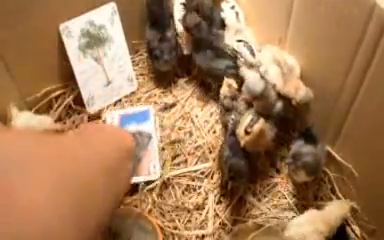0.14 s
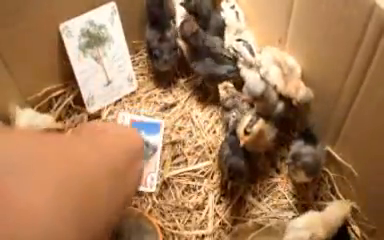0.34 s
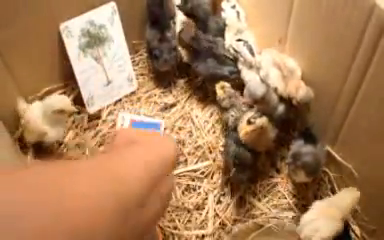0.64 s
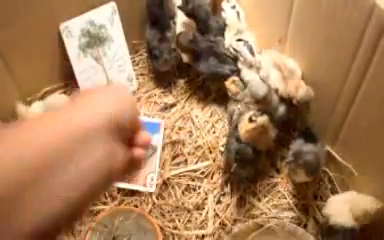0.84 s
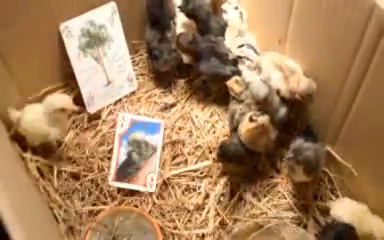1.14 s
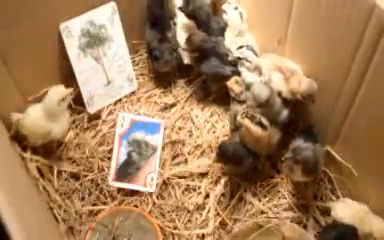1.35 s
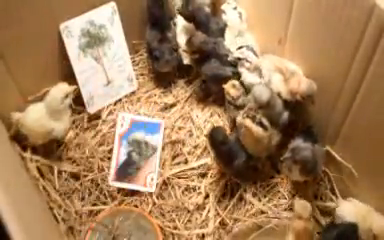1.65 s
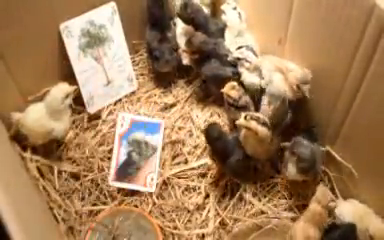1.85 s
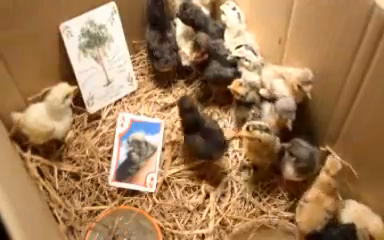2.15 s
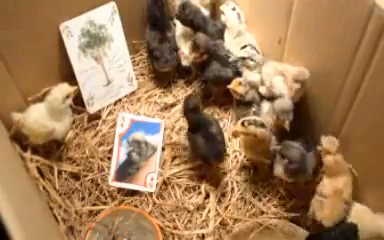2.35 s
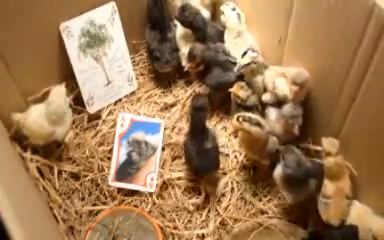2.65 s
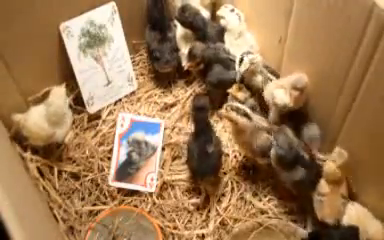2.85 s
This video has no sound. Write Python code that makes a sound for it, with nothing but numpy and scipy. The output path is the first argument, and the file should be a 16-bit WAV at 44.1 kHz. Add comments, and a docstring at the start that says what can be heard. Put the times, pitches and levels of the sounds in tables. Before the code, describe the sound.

Young chicks peep shrilly and repeatedly in a straw-lined cardboard box, with a soft knock

```python
"""Chicks peeping in a straw-lined box

Young chicks peep indoors in a cardboard box, close to the microphone, over room air, a low hum and a thin hiss.
Each loud peep is a gliding whistle: it starts near 5 kHz, breaks downward and slides away as its octave
takes over. Shorter glides make the soft cheeps and chirps of other chicks. Bursts of noise knock on the box,
which rings, and snap in the straw. Echoes from the box and the room are decaying noise."""
import sys
import numpy as np
from scipy import signal
from scipy.fft import rfft, irfft
from scipy.io import wavfile
from scipy.ndimage import uniform_filter1d, minimum_filter1d

SR = 44100
rng = np.random.default_rng(int(sys.argv[2]) if len(sys.argv) > 2 else 0)


def transcribe(u):
    """Save the signal u as a 16-bit wav file named by the first command-line argument.

    u: samples, shape (n,) or (channels, n), limited to [-1, 1]; the rate is SR.
    q: integer samples, one column per channel.
    """
    v = np.clip(np.atleast_2d(u).T, -1, 1)
    q = np.round(v * 32767).astype(np.int16)
    wavfile.write(sys.argv[1], SR, q)


N = 132300  # samples: 3 s


def amp(db):
    """Turns decibels into a gain."""
    return 10 ** (np.asarray(db) / 20)


def unit(x):
    """Scales a sound to an rms (average strength) of 1."""
    return x / np.sqrt(np.mean(x ** 2) + 1e-20)


def read(points, hz):
    """Reads a table between its points, on a logarithmic frequency axis."""
    f, value = np.transpose(points)
    return np.interp(np.log(hz + 1), np.log(f + 1), value)


def add(mix, start_s, sound):
    """Mixes a sound in, starting at a given time."""
    start = max(round(start_s * SR), 0)
    part = mix[start:][:len(sound)]
    part += sound[:len(part)]


def colour(x, points):
    """Filters a sound by a table of frequency and level, then scales it to rms 1."""
    gain = amp(read(points, np.fft.rfftfreq(len(x), 1 / SR)))
    return unit(irfft(rfft(x) * gain, len(x)))


def band(size, hz, octaves):
    """Makes noise of rms 1 in a bell-shaped band around one frequency."""
    f = np.fft.rfftfreq(size, 1 / SR) + 1
    bell = np.exp(-.5 * (np.log2(f / hz) / octaves) ** 2)
    return unit(irfft(rfft(rng.standard_normal(size)) * bell, size))


def wander(rate_hz):
    """Makes smooth random motion of rms 1 by fading out noise above about rate_hz."""
    f = np.fft.rfftfreq(N, 1 / SR)
    smoothing = np.exp(-.5 * (f / rate_hz) ** 2)
    return unit(irfft(rfft(rng.standard_normal(N)) * smoothing, N))


def tone(hz):
    """Makes a sine of rms 1 that follows a pitch curve."""
    return np.sqrt(2) * np.sin(2 * np.pi * np.cumsum(hz) / SR)


def background():
    """Room air as coloured noise, a hum of tones wavering in pitch, and a thin hiss that flickers in level."""
    # colour of the air: [f/Hz, relative level/dB]
    air_colour = [(15, -40), (25, -7.5), (91, 3), (173, -2.5), (246, -1), (433, -6.5), (567, -7), (848, -5),
                  (970, -7), (1380, -6.5), (2630, -8), (3260, -7), (4870, -3.5), (7500, -8), (8810, -6),
                  (11200, -13.5), (15500, -23)]
    # tones of the hum: [f/Hz, level/dB]
    hum_tones = [(194, -63), (243, -57.5), (582, -64), (873, -62.5)]
    air_db, air_waver_db, air_waver_hz = -41.5, 0.26, 15
    hum_waver_hz, hum_waver_rate_hz = 2.74, 5.24
    hiss_hz, hiss_octaves, hiss_db = 7363, .028, -49.5
    hiss_flutter_db, hiss_flutter_hz = 4.5, 16

    hum = sum(amp(db) * tone(hz + hum_waver_hz * wander(hum_waver_rate_hz)) for hz, db in hum_tones)
    air_level = amp(air_db + air_waver_db * wander(air_waver_hz))
    air = air_level * colour(rng.standard_normal(N), air_colour)
    hiss_level = amp(hiss_db + hiss_flutter_db * wander(hiss_flutter_hz))
    hiss = hiss_level * band(N, hiss_hz, hiss_octaves)
    return air + hum + hiss


def knocks():
    """Dull contacts: a fading burst of noise plus the ringing tones of the cardboard."""
    # knocks on the box: [t/s, contact level/dB, contact f/Hz, contact width/octaves, ring level/dB]
    hits = [(0.846, -23.5, 1020, 0.77, -33.5), (.882, -28, 1650, .4, -49), (2.964, -34.5, 1620, 0.6, -43),
            (2.99, -35.5, 1400, 1.2, -51)]
    # ringing tones of the box: [f/Hz, relative level/dB, time to fall 60 dB/s]
    box_tones = [(96, 1, 0.061), (141, -2, 0.071), (216, 1, 0.029), (256, -1, 0.08), (511, 2.5, 0.034),
                 (1248, 9.5, 0.026)]
    contact_t60_s, ring_rise_s = 0.028, 0.0019

    out = np.zeros(N)
    t = np.arange(SR // 2) / SR
    ring = np.zeros(len(t))
    for hz, db, t60_s in box_tones:
        ring += amp(db - 60 * t / t60_s) * np.sin(2 * np.pi * (hz * t + rng.random()))
    ring *= np.minimum(t / ring_rise_s, 1)
    for start_s, db, hz, octaves, ring_db in hits:
        contact = amp(db - 60 * t / contact_t60_s) * band(len(t), hz, octaves)
        add(out, start_s, contact + amp(ring_db) * ring)
    return out


def straw():
    """Stalks shift and snap: each rustle is many tiny fading bursts of noise at random times and levels."""
    # rustles: [start t/s, length/s, middle level of the snaps/dB]
    rustles = [(0.851, 0.045, -34), (0.934, 0.08, -35)]
    snap_hz, snap_octaves, snap_t60_s = 1570, 1.6, 0.0063
    snaps_per_s, spread_db = 350, 5  # levels lie up to spread_db above or below the middle

    out = np.zeros(N)
    t = np.arange(SR // 50) / SR
    for start_s, length_s, db in rustles:
        for when, size in rng.random((int(length_s * snaps_per_s), 2)):
            snap = band(len(t), snap_hz, snap_octaves) * amp(-60 * t / snap_t60_s)
            snap_db = db + spread_db * (2 * size - 1)
            add(out, start_s + when * length_s, amp(snap_db) * snap)
    return out


def beak(hz):
    """The throat and beak weaken a tone more and more the higher it lies above their limit."""
    limit_hz, db_per_octave = 8140, -53
    return amp(db_per_octave * np.log2(np.maximum(hz / limit_hz, 1)))


def glide(length_s, from_hz, to_hz, db, bend=1):
    """A short whistle swells and fades as it slides; bend above 1 makes the slide steepen toward the end."""
    u = np.arange(0, length_s, 1 / SR) / length_s
    hz = from_hz + (to_hz - from_hz) * u ** bend
    return amp(db) * np.sqrt(np.sin(np.pi * u)) * beak(hz) * tone(hz)


def second_voices():
    """A second voice of the syrinx, the bird's voice organ, beats against the start of some peeps."""
    # second voices: [start t/s, length/s, first f/Hz, last f/Hz, level before the beak/dB]
    voices = [(0.854, 0.032, 4870, 5080, -26.5), (1.157, 0.014, 5610, 5390, -22),
              (1.184, 0.031, 4950, 4450, -16), (1.602, 0.028, 5300, 5600, -27),
              (1.456, 0.042, 5130, 5090, -30), (1.837, 0.032, 5110, 5180, -30.5),
              (2.171, 0.033, 5000, 5120, -24), (2.626, 0.021, 5080, 5180, -26.5)]
    out = np.zeros(N)
    for start_s, length_s, from_hz, to_hz, db in voices:
        add(out, start_s, glide(length_s, from_hz, to_hz, db))
    return out


def other_chicks():
    """Soft cheeps with an octave, and short low chirps that drop quickly, all unsteady in level."""
    # cheeps: [start t/s, length/s, first f/Hz, last f/Hz, level/dB, octave level/dB], before beak and flutter
    cheeps = [(0.164, 0.055, 3620, 3370, -40, -34.5), (0.601, 0.048, 4740, 4370, -30.5, -65),
              (0.627, 0.056, 3840, 2920, -26.5, -31.5), (0.964, 0.087, 3833, 3400, -38, -45.5),
              (1.224, 0.038, 3230, 2670, -28, -27), (1.42, 0.047, 4830, 4500, -42, -55),
              (2.075, 0.052, 5640, 4880, -33.5, -53), (2.318, 0.035, 5500, 5000, -37, -72),
              (2.906, 0.077, 5680, 4700, -40, -61)]
    # chirps: [start t/s, level before beak and flutter/dB]
    chirps = [(0.46, -42.5), (0.549, -46), (2.04, -44), (2.152, -48), (2.803, -44)]
    cheep_bend = 2.7
    chirp_s, chirp_from_hz, chirp_to_hz = 0.0185, 2000, 1284
    flutter_db, flutter_hz = 3.5, 72

    out = np.zeros(N)
    for start_s, length_s, from_hz, to_hz, db, octave_db in cheeps:
        low = glide(length_s, from_hz, to_hz, db, cheep_bend)
        octave = glide(length_s, 2 * from_hz, 2 * to_hz, octave_db, cheep_bend)
        add(out, start_s, low + octave)
    for start_s, db in chirps:
        add(out, start_s, glide(chirp_s, chirp_from_hz, chirp_to_hz, db))
    return out * amp(flutter_db * wander(flutter_hz))


def loud_peeps():
    """Unsteady whistles: two strong harmonics, a faint third, a wall echo, a little hiss following the level."""
    # one list per peep: [t/s, f/Hz, fundamental level/dB, octave level/dB], before beak and unsteadiness
    peeps = [
        [(0.168, 5000, -32.5, -39), (0.2, 5020, -17.5, -46), (0.209, 4880, -10, -28), (0.225, 4610, -15, -32),
         (0.232, 4194, -13, -32), (0.244, 3427, -11, -17), (0.252, 3260, -16.5, -9.5),
         (0.278, 3186, -18.5, -12.5), (0.297, 2987, -23, -12), (0.324, 2127, -36, -24), (0.332, 1970, -41, -40)],
        [(0.633, 4690, -27, -64), (0.651, 5020, -14, -65), (0.669, 4920, -9, -26), (0.691, 4700, -26.5, -35),
         (0.698, 4540, -8.5, -54), (0.703, 3930, -22.5, -42), (0.719, 3313, -17.5, -11.5),
         (0.744, 3234, -23.5, -11.5), (0.765, 3050, -26, -10.5), (0.789, 2447, -31.5, -13.5),
         (0.808, 1980, -47, -33)],
        [(0.848, 5150, -32, -59), (0.861, 5490, -27.5, -64), (0.878, 5184, -15.5, -59), (0.897, 4820, -24, -58),
         (0.901, 4664, -14, -54), (0.911, 3926, -14.5, -29), (0.942, 3230, -22, -27), (0.959, 2776, -33.5, -36)],
        [(1.153, 4915, -28, -55), (1.159, 4840, -18.5, -59), (1.171, 5080, -8, -62), (1.205, 4420, -13.5, -36),
         (1.223, 3494, -23.5, -22), (1.23, 3445, -14.5, -19.5), (1.244, 3223, -16, -13),
         (1.275, 3156, -24.5, -11), (1.291, 2863, -23.5, -10), (1.328, 2078, -43, -18.5),
         (1.336, 1900, -38, -39)],
        [(1.459, 4320, -29.5, -55), (1.487, 5000, -15.5, -58), (1.523, 4646, -15, -43),
         (1.5265, 4270, -7.5, -64), (1.529, 3655, -21.5, -31.5), (1.55, 3418, -14.5, -28),
         (1.556, 3170, -24, -23), (1.575, 2824, -24.5, -30.5), (1.581, 2690, -29, -19)],
        [(1.607, 4690, -22, -44), (1.614, 4885, -15.5, -44), (1.625, 4990, -9, -57), (1.654, 4600, -11.5, -30),
         (1.665, 4365, -7.5, -35), (1.671, 3750, -28, -39), (1.685, 3256, -17, -18.5),
         (1.718, 3135, -26.5, -15), (1.733, 3010, -20.5, -13), (1.78, 2130, -50, -18.5),
         (1.791, 1930, -58, -44)],
        [(1.834, 4270, -32.5, -55), (1.865, 5015, -14.5, -58), (1.901, 4490, -11.5, -56),
         (1.906, 3554, -20.5, -29), (1.921, 3382, -14, -34), (1.927, 3314, -22, -22.5), (1.949, 2805, -26, -22),
         (1.966, 2340, -45.5, -29)],
        [(2.162, 4300, -29, -62), (2.189, 4730, -24.5, -62), (2.195, 4926, -13.5, -64),
         (2.222, 4526, -13.5, -28), (2.225, 4580, -36, -54), (2.232, 4360, -10, -58), (2.238, 4166, -8, -62),
         (2.241, 3286, -17.5, -29), (2.25, 3304, -15, -22), (2.287, 2513, -33, -24), (2.296, 2350, -39, -33)],
        [(2.348, 4570, -24, -53), (2.366, 4815, -8.5, -58), (2.394, 4370, -10.5, -55), (2.4, 3560, -26, -44),
         (2.414, 3252, -20, -19), (2.452, 2950, -22.5, -11), (2.467, 2815, -38, -10), (2.474, 2706, -25, -13),
         (2.494, 2147, -51, -18), (2.513, 2040, -46, -43)],
        [(2.618, 4216, -31, -61), (2.641, 4680, -28, -53), (2.647, 4953, -17, -44), (2.664, 4870, -16, -45),
         (2.686, 4360, -10.5, -77), (2.69, 3415, -18, -27), (2.708, 3270, -17.5, -22),
         (2.734, 2697, -26, -21.5), (2.756, 2380, -48, -33.5)],
    ]
    # one row per peep: [hiss level against the harmonics/dB, wall echo delay/ms, wall echo level/dB]
    traits = [(-21, 5.2, -13.5), (-25, 2.5, -18), (-22, 4.3, -7), (-32, 5.0, -24), (-26.5, 5.0, -9),
              (-25, 2.4, -17), (-29.5, 5.2, -10.5), (-28.5, 3.9, -8.5), (-30.5, 3.3, -19), (-24.5, 3.9, -7)]
    # colour of the hiss: [f/Hz, relative level/dB]
    hiss_colour = [(1000, -31), (2500, -7), (4500, 3), (7000, -2), (9700, 0), (11800, -5), (12400, -13),
                   (16000, -12)]
    third_db = -31  # against the octave
    edge_s = .0015  # fade at both ends
    pitch_share, level_share, unsteady_hz = .003, .02, 200
    tail_flutter_db, tail_flutter_hz = 4, 70

    out, hiss = np.zeros(N), np.zeros(N)
    jitter = 1 + pitch_share * wander(unsteady_hz)
    shimmer = 1 + level_share * wander(unsteady_hz)
    flutter_db = tail_flutter_db * wander(tail_flutter_hz)
    for peep, (hiss_db, echo_ms, echo_db) in zip(peeps, traits):
        s, *controls = np.transpose(peep)
        at = np.arange(int(s[0] * SR), int(s[-1] * SR))
        t = at / SR
        hz, low_db, high_db = (np.interp(t, s, c) for c in controls)
        hz = hz * jitter[at]
        gate = np.clip(np.minimum(t - t[0], t[-1] - t) / edge_s, 0, 1)
        # the fundamental breaks up as it fades, in the second half
        progress = (t - t[0]) / (t[-1] - t[0])
        low_db = low_db + flutter_db[at] * np.clip(2 * progress - 1, 0, 1)
        voice = np.zeros(len(t))
        for k, db in enumerate([low_db, high_db, high_db + third_db], 1):
            voice += gate * amp(db) * beak(k * hz) * tone(k * hz)
        add(out, t[0], voice)
        add(out, t[0] + echo_ms / 1000, amp(echo_db) * voice)
        hiss[at] += amp(hiss_db) * gate * np.hypot(amp(low_db), amp(high_db))
    return out * shimmer + hiss * colour(rng.standard_normal(N), hiss_colour)


def scatter(x):
    """The inside of the box blurs a sound with a quick burst of decaying random echoes."""
    t60_s, level_db = 0.17, -22
    t = np.arange(SR // 4) / SR
    taps = rng.standard_normal(len(t)) * amp(-60 * t / t60_s)
    return signal.fftconvolve(x, amp(level_db) * taps / np.linalg.norm(taps))[:N]


def room(x):
    """The room adds a diffuse tail of noise in which each frequency dies at its own speed."""
    # decay of the room: [f/Hz, time to fall 60 dB/s]
    room_decay = [(150, 0.65), (1000, 0.25), (3200, 0.4), (5000, 0.22), (7000, 0.25), (14000, 0.075)]
    hz, t, noise = signal.stft(rng.standard_normal(SR), SR, nperseg=256)
    fade = amp(-60 * t / read(room_decay, hz)[:, None])
    tail = signal.istft(noise * fade, SR)[1]
    return signal.fftconvolve(x, tail / np.linalg.norm(tail))[:N]


def shifting(space, x, count=4):
    """The echo is diffuse: the sound fades between random echo patterns in turn, so none stands out."""
    shift_s = .35  # time from one pattern to the next
    t = np.arange(N) / SR
    # 0 where a pattern is at its fullest, silent from 1 away
    distance = ((t / shift_s - np.arange(count)[:, None] + 1) % count) - 1
    return sum(space(x * np.cos(np.pi / 2 * np.minimum(u, 1))) for u in distance)


def scene():
    """Joins chicks, knocks and straw, adds the echoes of box and room, and lays them over the background."""
    room_db, extra_bump_db = -14, -6  # knocks and straw send an extra share into the room
    bumps = knocks() + straw()
    near = second_voices() + other_chicks() + loud_peeps() + bumps
    box_echo = shifting(scatter, near)
    room_echo = shifting(room, amp(room_db) * near + amp(extra_bump_db) * bumps)
    return (near + box_echo + room_echo + background())[None]


def record(dry):
    """A quick limiter turns down the loudest moments; then the recorder removes the highest frequencies."""
    limit_db, limit_share = -2.5, 0.35  # threshold, and share of the excess decibels removed
    window_s, cut_hz = .003, 15800
    size = int(window_s * SR)
    peak = -minimum_filter1d(-abs(dry[0]), size)  # largest swing in the window
    peak_db = 20 * np.log10(1e-9 + peak)
    excess_db = uniform_filter1d(np.maximum(peak_db - limit_db, 0), size)
    held = dry * amp(-limit_share * excess_db)
    low_pass = signal.firwin(511, cut_hz, window=("kaiser", 9), fs=SR)
    return signal.oaconvolve(held, low_pass[None], "same")


dry = scene()
out = record(dry)
transcribe(out)
```